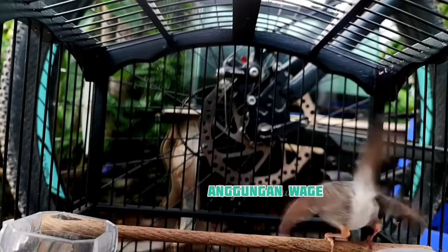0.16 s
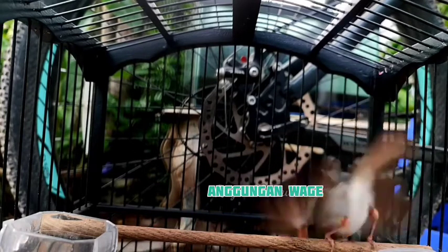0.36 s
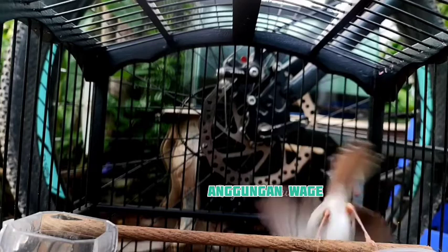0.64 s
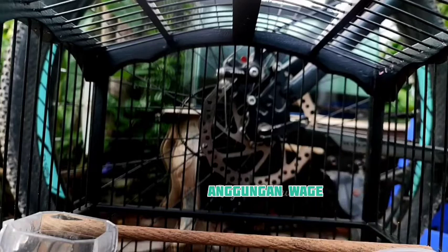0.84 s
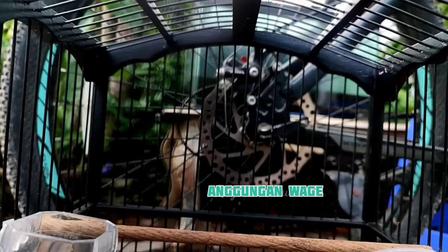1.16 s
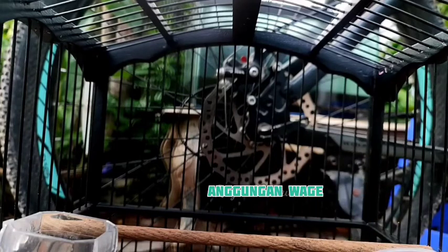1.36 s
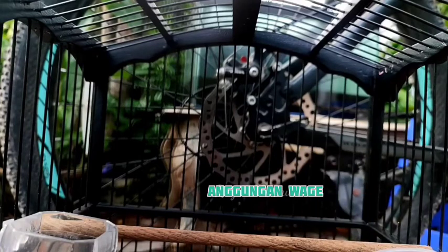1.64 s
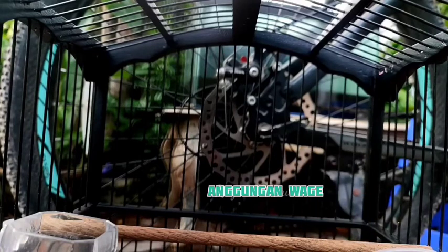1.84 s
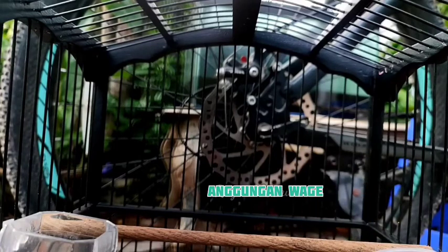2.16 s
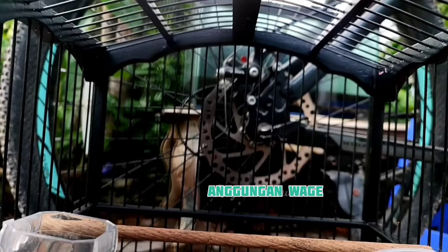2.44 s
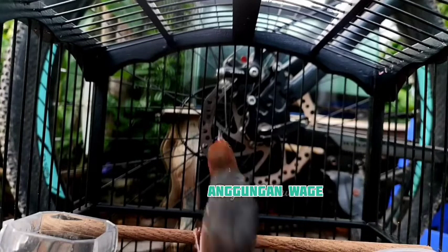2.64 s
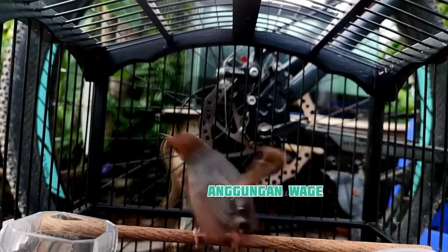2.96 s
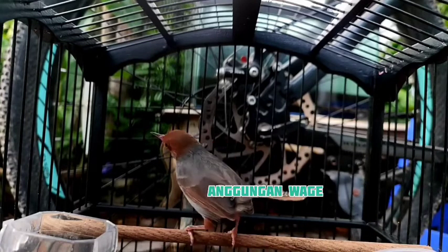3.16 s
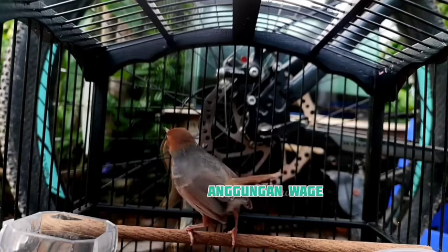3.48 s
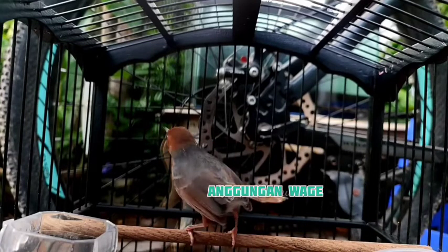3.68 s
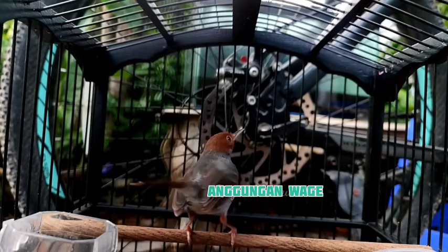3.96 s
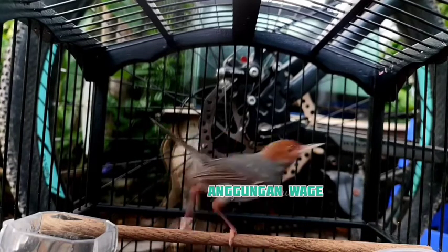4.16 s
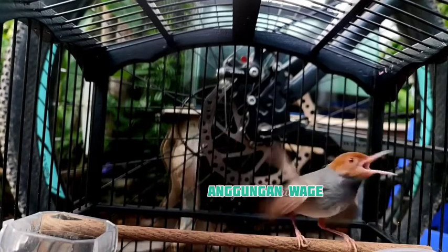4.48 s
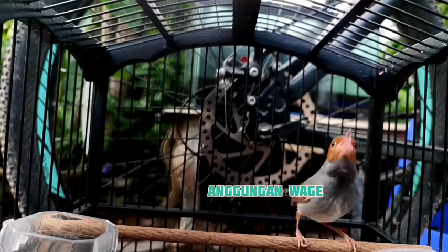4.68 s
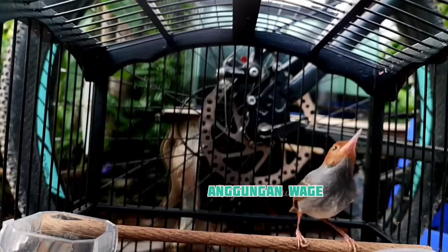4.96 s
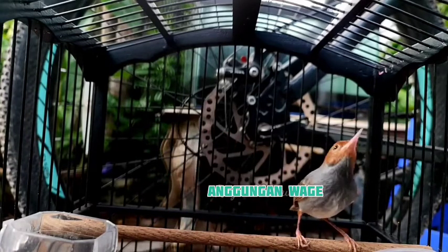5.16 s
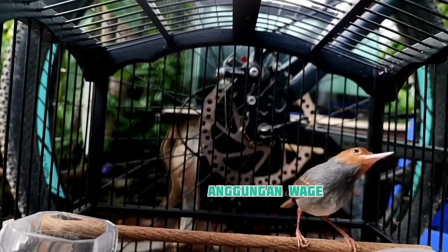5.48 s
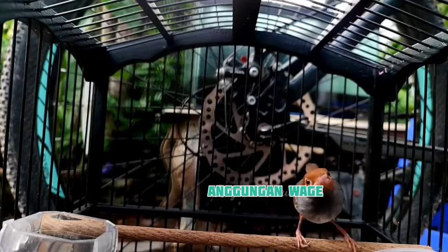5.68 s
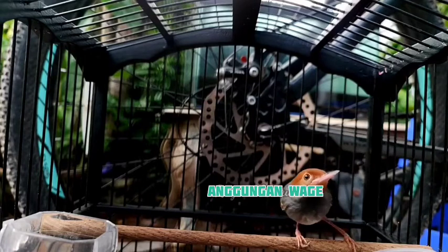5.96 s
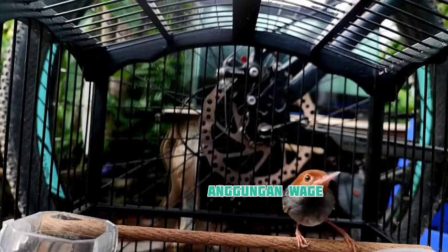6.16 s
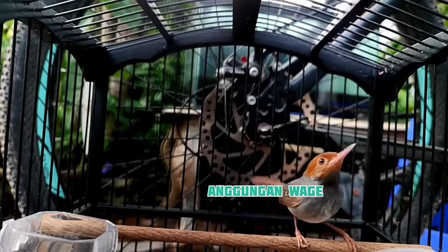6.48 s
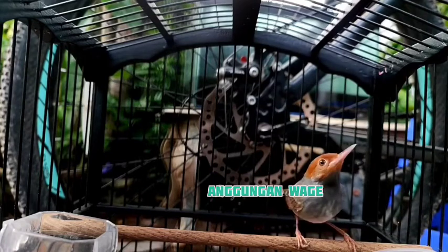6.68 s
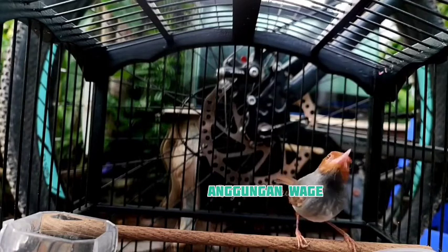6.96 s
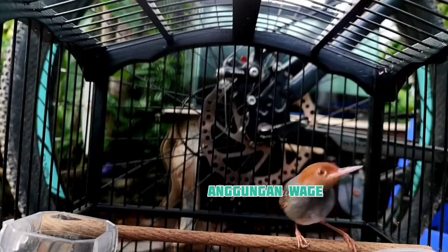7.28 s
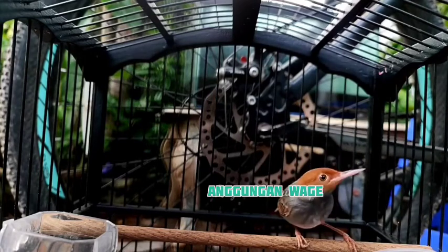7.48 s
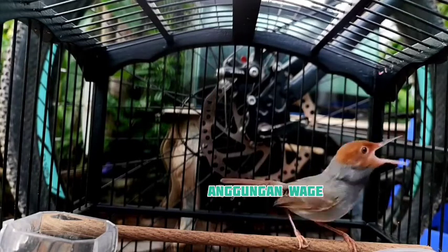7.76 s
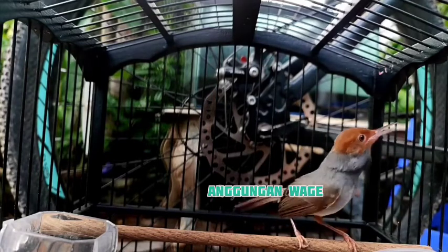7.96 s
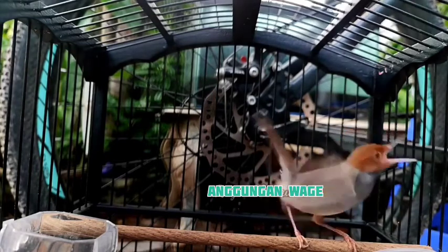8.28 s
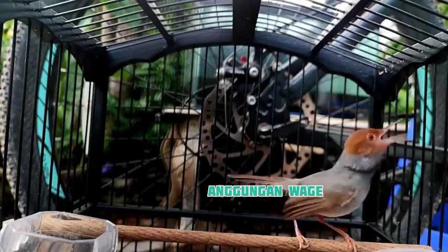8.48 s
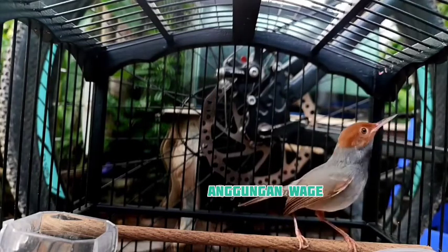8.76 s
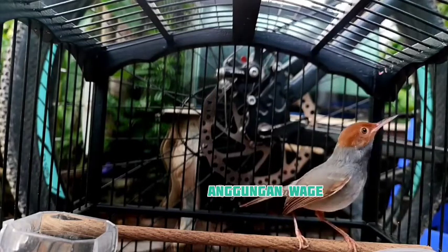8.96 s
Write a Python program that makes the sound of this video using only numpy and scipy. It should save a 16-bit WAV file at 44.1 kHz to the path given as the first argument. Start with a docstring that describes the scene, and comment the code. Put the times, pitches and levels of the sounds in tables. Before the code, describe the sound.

A small caged bird flicks its wings and sings three sharp, quick four-note phrases up close, over faint distant birds and low traffic hum.

```python
"""Far engines, a low traffic hum and hiss run throughout: harmonic series and coloured noise.
From the start other birds chirp, whistle, tick and wheeze, as swept sines, with one reedy toot at 2.3 s.
At 4.6, 7.7 and 8.4 s a caged tailorbird flicks its wings (noise bursts), then sings a four-note phrase of
fast sine glides close by; a chatter starts at 7.2 s and the wheeze returns at 8.3 s.
Loud peaks push the recorder's gain down, and the background swells back slowly."""
import sys
import numpy as np
from scipy import signal
from scipy.fft import rfft, irfft
from scipy.io import wavfile
from scipy.ndimage import uniform_filter1d, minimum_filter1d, map_coordinates

SR = 44100
rng = np.random.default_rng(int(sys.argv[2]) if len(sys.argv) > 2 else 0)


def digitize_waveform(pressure):
    """Quantize a signal to 16-bit integers and store it at the path in sys.argv[1].

    Rows of a 2-D input are taken as channels; values are limited to [-1, 1].
    """
    field = np.atleast_2d(pressure).T
    bounded = np.clip(field, -1, 1)
    quanta = np.round(bounded * 32767).astype(np.int16)
    wavfile.write(sys.argv[1], SR, quanta)


N = 402191
TIME = np.arange(N) / SR   # s

# All levels are relative, ahead of later mixing and gain control.
# Glides of the four notes of the phrase [t/s after onset, f/Hz]
PIP_PITCH = [(0, 2900), (.002, 3500), (.006, 3700), (.01, 3770), (.015, 3680), (.02, 3980), (.024, 3880)]
TSEW_PITCH = [(0, 4950), (.007, 4120), (.017, 3390), (.025, 3220), (.035, 3280), (.044, 3440), (.047, 3350),
              (.05, 2500)]
TUT_PITCH = [(0, 2780), (.007, 2680), (.014, 2620), (.029, 2570)]
WEEO_PITCH = [(0, 2250), (.004, 2270), (.012, 2470), (.016, 2560), (.02, 2760), (.028, 2865), (.035, 2810),
              (.042, 2520), (.052, 2250), (.063, 2020), (.069, 1830), (.076, 1050)]
# Notes; pressure raises pitch and level together [glide, release/s, slope/dB per octave, rasp level/dB]
PIP = (PIP_PITCH, 0.0036, 20, 0)
TSEW = (TSEW_PITCH, 0.0028, 23, 2)
TUT = (TUT_PITCH, 0.021, 15, -7.5)
WEEO = (WEEO_PITCH, 0.012, 13.7, 2)
# The song [t/s, note, time stretch, pitch factor, level/dB, attack/s, gain over the note/dB,
#   left-right level/dB, its change over the note/dB, lag of the right port/ms,
#   delay of the nearest reflection left/ms, right/ms, reflection level/dB]
SONG = [(4.6976, PIP, 0.91, 1, -13, 0.0076, 0.5, 5.5, 2, 0.26, 1.03, 2.06, -13),
        (4.734, TSEW, .98, 1, -7, 0.0078, -1.5, 1.5, -3.5, 0.31, 1.6, 1.14, -11.5),
        (4.8165, TUT, 1.07, 0.99, -8, 0.011, 5, 5.5, -9, .25, 1.07, 1.89, -17),
        (4.8575, WEEO, 1, 0.99, -10, .004, 3, 11.5, -3, 0.19, 0.27, 0.79, -4),
        (7.875, PIP, 0.91, .994, -9.5, 0.0083, 4, 5.5, -1, 0.33, 0.489, 2.6, -7),
        (7.9049, TSEW, 1.12, 1.004, -11.5, .012, -9, -3.5, -3, 0.18, 2.04, 0.075, -4),
        (8.005, TUT, 0.79, 1, -11, 0.0062, -1, 7, -2, 0.039, 1.08, 1.22, -17),
        (8.038, WEEO, 0.96, 0.99, -10.5, 0.0055, 1, 3.5, 1, 0.3, 0.684, 1.11, -2.5),
        (8.4997, PIP, 1.01, .993, -12, 0.013, 3, 12, 9.5, 0.19, 0.3, 1.2, -1.5),
        (8.5326, TSEW, 1.03, 0.99, -8.5, 0.0092, -5.5, -7, -8, 0.5, 1.42, .64, -8),
        (8.6308, TUT, 1, 1, -9.5, 0.0089, 0, 6, 3.5, .14, 0.31, 2.5, -4.5),
        (8.6651, WEEO, 1.016, 1, -7.5, .0045, -3, 3.5, -1, 0.27, 0.42, 0.7, -9.5)]
SONG_DB = 7.5
FLUTTER_DB, FLUTTER_PER_S = 2.07, 450   # the voice trembles within a note
FLICK_S, FLICK_DB = .006, -24   # a brief rasp where a note starts and stops
# Colour of that rasp [f/Hz, level/dB]
FLICK_COLOUR = [(900, -15), (1300, -14), (2100, -8.5), (2600, -3), (3000, -3.5), (4400, -8.5), (5500, -23),
                (12000, -34.5)]
# Overtones that the beak lets out [f/Hz, level/dB]
BEAK = [(4500, -7), (5600, -9.5), (6700, -5), (7600, 1.5), (8500, -22), (9600, -2), (10600, -5),
        (11400, 10.5), (12400, -1.5), (14000, -14)]
# Airy edge of the voice [f/Hz, level/dB]
AIR = [(600, -3.5), (1300, -1), (2000, 1.5), (2500, 3.5), (4300, 5.5), (5500, -7), (7200, -15),
       (9000, -19.5), (11600, -11.5), (14000, -30.5)]
# Left-right balance along the glides [f/Hz, left-right level/dB]
PORT_BALANCE = [(1600, 4.5), (2100, 7), (2450, -9), (2860, -1)]
# Echoes from the cage and nearby things [left delay/ms, right delay/ms, level/dB]
ECHOES = [(2.1, 1.8, -23), (4.4, 5.1, -11.5), (7.2, 6.4, -21), (11.9, 9.2, -17.5)]
# Colour of the porch reverberation [f/Hz, level/dB]
PORCH = [(500, 2.5), (2300, 4), (2850, 1.5), (3300, 3), (3700, 2), (4300, 2.5), (7000, 5), (14000, -2)]

# Feather snaps, one for each wing stroke [t/s, level/dB]
WINGS = [(4.563, -18.5), (4.576, -12), (4.592, -17), (4.606, -12), (4.6205, -11.5), (5.245, -24),
         (7.737, -16.5), (7.752, -17), (7.767, -12.5), (7.782, -14.5), (7.796, -17), (8.394, -8),
         (8.4095, -15)]
# Colour of a snap [f/Hz, level/dB]
SNAP = [(300, -37), (1200, 0), (2500, 8.5), (4000, 3.5), (5200, 1.5), (6300, 10), (7500, 5.5), (9000, -16),
        (14000, -17)]
# Soft knocks [t/s, level/dB, f/Hz]
KNOCKS = [(5.988, -25.5, 775), (8.394, -25, 472)]
# Modes of a knock [multiple of its pitch, level/dB, t60/s]
KNOCK_MODES = [(.55, -21, .012), (1, 5, 0.0094), (1.7, 0.5, .009)]
# Brief rustles [t/s, length/s, level/dB, favoured f/Hz, emphasis/dB]
RUSTLES = [(2.541, 0.32, -47, 4200, 7.5), (2.588, .16, -48.5, 12600, 22), (2.596, .12, -46, 4620, 13),
           (2.646, 0.13, -45.5, 3280, 20), (2.748, 0.18, -40.5, 3700, 14), (3.484, 0.23, -55, 6750, 7),
           (3.893, 0.27, -52.5, 5000, 11), (4.295, 0.089, -56, 5500, -2), (4.552, 0.11, -42, 5170, 7),
           (5.546, 0.18, -43.5, 2600, 2.5), (5.75, 0.098, -37, 7360, 9.5), (5.763, 0.11, -37.5, 1590, 7.5),
           (5.809, .055, -37, 1390, 15), (5.913, .13, -37.5, 3270, 7), (5.928, 0.059, -42.5, 1500, 16),
           (6.025, 0.12, -48.5, 2960, 3.5), (7.103, 0.11, -50.5, 5530, 3), (7.704, 0.11, -43, 5800, 17),
           (8.273, 0.23, -38.5, 3500, 7.5)]
# Colour common to all rustles [f/Hz, level/dB]
FEATHERS = [(300, -14.5), (700, 0), (1500, 0.5), (4000, 1), (7500, -1.5), (9200, -7), (11500, -2.5),
            (14000, -8)]
RUSTLE_WIDTH_OCTAVES = 0.36

# A neighbour's rising wheeze [t/s after onset, f/Hz]
WHEEZE_PITCH = [(0, 3350), (.04, 3650), (.08, 3800), (.11, 4000), (.14, 5700), (.16, 6300), (.18, 6400)]
# Its occurrences [t/s, time stretch, final level/dB, second harmonic level/dB]
WHEEZES = [(0.798, 0.91, -23, -5), (8.307, 0.88, -23.5, -6.5)]
WHEEZE_SWELL_DB_PER_S, WHEEZE_ATTACK_S, WHEEZE_RELEASE_S = 111, 0.0076, 0.02
# Relative pitch shake while it holds, and the shake added at the fastest sweep
WHEEZE_JITTER, WHEEZE_BREAK_JITTER = 0.013, 0.14
WHEEZE_CATCH_S, WHEEZE_CATCH_DB = .02, -41   # the note starts with a broad catch
# Colour of the catch [f/Hz, level/dB]
CATCH = [(1000, -17), (1700, -4), (2500, 4), (3400, -13.5), (4200, -5.5), (6800, -7.5), (9000, -23)]
# A rough hiss builds around the break in the note
WHEEZE_HISS_AT_S, WHEEZE_HISS_S, WHEEZE_HISS_DB = 0.067, 0.12, -8
# Colour of the rough hiss [f/Hz, level/dB]
WHEEZE_HISS = [(2500, -25), (3500, -13), (4300, 4), (5500, -7.5), (7000, -13.5), (9000, -10), (10600, -14),
               (11800, -9.5), (14000, -14)]
# Colour of the wheezer's throat [f/Hz, level/dB]
WHEEZE_THROAT = [(2000, -20.5), (2900, -13), (3400, -0.5), (7500, 1), (9000, -3.5), (10400, -1),
                 (11600, -0.5), (14000, -2)]
RAGGED_DB, RAGGED_HZ, RAGGED_S = 2.3, 600, .011   # depth, width, length of patches in a rough sound

# Raspy arched chirps [t/s, length/s, top f/Hz, share of the note before its top, level/dB]
CHIRPS = [(0.133, 0.045, 5210, 0.66, -41), (0.498, 0.12, 5350, 0.46, -42),
          (0.801, 0.0092, 3360, 0.47, -28.5), (1.209, 0.084, 5350, 0.533, -38.5),
          (1.265, 0.074, 5900, .7, -48), (1.601, 0.047, 4210, 0.65, -46), (1.72, 0.077, 4410, 0.72, -49),
          (2.176, 0.071, 6080, 0.81, -38), (2.417, 0.071, 5600, 0.051, -44.5),
          (2.624, 0.059, 6280, 0.59, -36.5), (2.949, 0.084, 6120, 0.72, -41), (3.552, 0.039, 5770, 1, -37),
          (3.608, .06, 5300, 0.076, -41), (3.963, 0.029, 5440, 0.93, -33.5),
          (4.026, 0.0406, 5130, 0.72, -36.5), (4.315, 0.014, 6800, 0.28, -42.5),
          (5.16, .07, 5670, 0.92, -61), (6.237, 0.051, 5230, 1, -46), (6.487, 0.047, 3670, .5, -50.5),
          (6.573, 0.054, 3460, 0.61, -50), (6.887, 0.089, 4500, 0.48, -50),
          (7.034, 0.032, 5040, 0.57, -45.5), (9.023, 0.16, 5330, 0.3, -43)]
# Usual share before the top (faint chirps), depth of the arch, relative pitch shake
CHIRP_TOP, CHIRP_BEND, CHIRP_JITTER = .65, .18, .032
FAINT_CHIRPS_PER_S, FAINT_CHIRP_DB, FAINT_CHIRP_S = 0.57, -66.5, 0.064
FAINT_LOW_HZ, FAINT_HIGH_HZ = 4200, 5600
# Thin, clean whistles [t/s, length/s, level/dB, decay/dB per s, starting f/Hz, held f/Hz]
SEEPS = [(.29, 0.065, -55, 5, 5970, 6630), (0.37, 0.024, -36, 10, 6750, 7360),
         (0.392, 0.168, -29.5, 29, 7034, 7150), (5.255, 0.081, -44, 10, 6720, 7100)]
SEEP_RISE_S = 0.026
# Runs of ticks [t/s, ticks per s, length/s, level/dB]
TICK_RUNS = [(0.662, 21.6, .12, -47.5), (2.716, 20, .07, -44), (2.91, 17.3, .26, -39.5),
             (6.917, 20.2, .28, -46.5)]
TICK_S, TICK_START_HZ, TICK_END_HZ = 0.0092, 3170, 3370
# A chatter of quick upward strokes in close succession, with a second voice arching above it
CHATTER_AT_S, STROKES_PER_S, STROKE_S, CHATTER_DB = 7.228, 21.7, .042, -33.6
STROKE_START_HZ, STROKE_END_HZ = 3000, 3730
FIRST_STROKE_PITCH, FIRST_STROKE_SOFTER_DB = .87, 9
CHATTER_FADE_DB_PER_S, CHATTER_OVERTONE_DB = 37, -19.5
STROKE_RASP_DB = -6.5   # a rattle under the start of each stroke
# Colour of the rattle [f/Hz, level/dB]
STROKE_RASP = [(1800, -18), (2600, -7.5), (3200, -6), (3750, 6), (4100, -40), (7000, -19), (10000, -38),
               (11500, -18), (14000, -42)]
UPPER_AT_S, UPPER_S, UPPER_HZ, UPPER_BEND, UPPER_TOP, UPPER_DB = 7.29, .2, 4870, .22, .8, -43
TOOT_AT_S, TOOT_S, TOOT_HZ, TOOT_BEND, TOOT_DB = 2.345, 0.137, 446, 0.18, -36.5
# Partials of the far toot [multiple of TOOT_HZ, level/dB]
TOOT_PARTIALS = [(2, 0), (3, -18), (4, -22), (5, -15)]

# A far motorbike's speed [t/s, firings per s]
MOTORBIKE_SPEED = [(0, 84), (1.1, 76), (1.7, 72), (2.3, 84), (3.1, 70), (3.9, 66), (4.6, 80), (5.15, 76),
                   (5.6, 73), (6.3, 69), (6.75, 72.5), (7.4, 70.3), (9.12, 71)]
# Its loudness [t/s, level/dB]
MOTORBIKE_LEVEL = [(0, -68), (1.05, -54), (2.15, -68), (3.1, -55.5), (4.35, -61.5), (5.2, -54.5),
                   (6.6, -55.5), (7.4, -55), (9.12, -58.5)]
# Colour of its exhaust [f/Hz, level/dB]
EXHAUST = [(70, -7), (140, -0.5), (210, -6.5), (280, -13), (350, -11.5), (420, -10.5), (495, -6.5),
           (565, -11), (635, -12), (710, -7), (800, -16.5), (1000, -22.5)]
# Loudness of passing engines [t/s, level/dB]
ROAR_LEVEL = [(0, -54), (.7, -63), (1.15, -56.5), (1.65, -58.5), (2.15, -49.5), (2.8, -58.5), (3.2, -75),
              (3.8, -57), (4.3, -48.5), (4.65, -52.5), (5.2, -67.5), (6.4, -58.5), (7.4, -59.5),
              (9.12, -65.5)]
# Colour of their roar [f/Hz, level/dB]
ROAR = [(120, -25), (230, -5.5), (320, 2.5), (400, -5), (520, -17), (1000, -35.5), (2000, -72.5)]
# Slow swell of the traffic [t/s, level/dB]
TRAFFIC_SWELL = [(0, -1), (2.4, 0.5), (3.3, 0.5), (4.4, 1), (6.4, 0.5), (9.12, 1.5)]
# Colour of the low hum [f/Hz, level/dB]
RUMBLE = [(12, -37), (20, -0.5), (76, -1.5), (128, 1), (149, -1.5), (198, -11.5), (255, -14), (318, -18.5),
          (441, -22.5), (512, -33), (700, -29.5), (910, -53.5), (1540, -120)]
# Colour of the airy hiss [f/Hz, level/dB]
HISS = [(290, -37.5), (500, -1), (728, -4.5), (825, -5), (1030, -7.5), (1680, -8), (2440, -8.5),
        (3860, -13), (12600, -23.5), (13900, -26.5)]
RUMBLE_DB, HISS_DB = -42.5, -53
# Coherence of the two ports [f/Hz, left-right likeness]
LIKENESS = [(30, 0.42), (70, 1), (160, 0.98), (350, 0.94), (700, 0.19), (1400, 0), (12000, 0)]
CUTOFF_HZ = 14100


def tailorbird():
    """Frequency-swept near-sines with raspy edges; as the head turns, reflection combs each note anew."""
    song = np.zeros((2, N))
    rasp, flicks, effort, lag_ms = np.zeros((4, N))
    for (s, note, stretch, tuning, level_db, attack_s, swell_db, pan_db, turn_db,
         late_ms, left_ms, right_ms, bounce_db) in SONG:
        pitch, release_s, db_per_octave, rasp_db = note
        hz = tuning * curves(pitch, stretch)[0]
        along = np.linspace(-.5, .5, len(hz))
        db = SONG_DB + level_db + swell_db * along + db_per_octave * np.log2(hz / hz.mean())
        gate = fade(len(hz), attack_s, release_s)
        flutter_db = FLUTTER_DB * wobble(len(hz), FLUTTER_PER_S)
        tone = gate * whistle(hz, db + flutter_db, [(1, 0)], jitter=.009)
        balance_db = pan_db + turn_db * along + at_hz(PORT_BALANCE, hz)
        left, right = tone * from_db(balance_db * [[.5], [-.5]])
        add(song, s, np.array([bounced(left, left_ms, bounce_db), bounced(right, right_ms, bounce_db)]))
        overtones = [(1.5, -42), (2, -35), (3, -43), (4, -51)]
        add(rasp, s, gate * whistle(hz, db + rasp_db, overtones, jitter=.06, jitter_rate=4100))
        add(effort, s, gate * from_db(db + rasp_db))
        for edge_s in (s, s + len(hz) / SR):
            flick = from_db(SONG_DB + level_db + FLICK_DB) * puff(FLICK_S, FLICK_COLOUR)
            add(flicks, edge_s - FLICK_S / 2, flick)
        lag_ms[int(s * SR):] = late_ms
    air = from_db(-41.5) * effort * rms_one(tint(rng.standard_normal(N), AIR))
    # the edge is beamed away and heard by reflection
    edge = far_off(tint(rasp, BEAK) + air, direct_db=-1.5, room_db=1.5, t60=0.058)
    edge += far_off(flicks, direct_db=-9.5, room_db=-2, t60=0.1)
    return edge + in_cage(song, lag_ms, echo_db=-3.5, room_db=-23.0, t60=0.35)


def wings_and_feet():
    """Impulsive excitation: feathers snap at the end of each wing stroke, and feet knock on the perch."""
    snaps = bursts(WINGS, SNAP, decay_s=.0014, swish_db=-20, swish_s=.005)
    return in_cage(snaps + knocks(), lag_ms=.2, echo_db=-6, room_db=-16, t60=.35)


def bursts(rows, colour, decay_s, swish_db, swish_s):
    """Amplitude-modulated noise: each contact is a sharp crack inside a softer swish."""
    envelope = np.zeros(N)
    t = np.arange(-SR // 50, SR // 10) / SR
    crack = (t >= 0) * np.exp(-abs(t) / decay_s)
    shape = crack + from_db(swish_db) * np.exp(-abs(t) / swish_s)
    for s, db in rows:
        add(envelope, s + t[0], from_db(db) * shape)
    noise = rms_one(tint(rng.standard_normal(N), colour))
    return .5 * envelope * noise * np.ones((2, 1))


def knocks():
    """Modal decay: the cage answers a shifting foot with a few damped sines."""
    out, t = np.zeros(N), TIME[:SR // 20]
    for s, db, hz in KNOCKS:
        for k, level_db, t60 in KNOCK_MODES:
            add(out, s, from_db(db + level_db - 60 * t / t60) * np.sin(2 * np.pi * k * hz * t))
    return out


def rustles():
    """Friction noise: soft, ragged swells of feather hiss, each with one favoured band."""
    out, hz = np.zeros((2, N)), np.geomspace(300, 14000, num=40)
    for s, length, db, centre_hz, emphasis_db in RUSTLES:
        size = int(length * SR)
        octaves_off = np.log2(hz / centre_hz)
        band_db = emphasis_db * np.exp(-.5 * (octaves_off / RUSTLE_WIDTH_OCTAVES) ** 2)
        colour = list(zip(hz, at_hz(FEATHERS, hz) + band_db))
        noise = rms_one(tint(rng.standard_normal((2, size)), colour))
        grain_db = 1.8 * wobble(size, rate=500)
        add(out, s, noise * np.hanning(size) ** 0.6 * from_db(db + grain_db))
    return ragged(out + from_db(-3.5) * reverb(out, t60=0.27))


def wheezer():
    """Frequency jitter grows with sweep rate: a swelling, rising note turns harsh where it climbs fastest."""
    out, catches = np.zeros((2, N))
    for s, stretch, level_db, overtones_db in WHEEZES:
        hz, = curves(WHEEZE_PITCH, stretch)
        sweep = uniform_filter1d(np.gradient(hz), size=1900)
        jitter = WHEEZE_JITTER + WHEEZE_BREAK_JITTER * (sweep / sweep.max()) ** 2
        db = level_db - WHEEZE_SWELL_DB_PER_S * TIME[:len(hz)][::-1]
        partials = [(1, 0), (2, overtones_db), (3, overtones_db - 2)]
        gate = fade(len(hz), WHEEZE_ATTACK_S, WHEEZE_RELEASE_S)
        add(out, s, gate * whistle(hz, db, partials, jitter, jitter_rate=3300))
        add(catches, s - WHEEZE_CATCH_S / 4, from_db(WHEEZE_CATCH_DB) * puff(WHEEZE_CATCH_S, CATCH))
        hiss = from_db(level_db + WHEEZE_HISS_DB) * puff(WHEEZE_HISS_S, WHEEZE_HISS)
        add(out, s + WHEEZE_HISS_AT_S, hiss)
    return ragged(far_off(tint(out, WHEEZE_THROAT) + catches, direct_db=1.0, room_db=4.5, t60=0.35))


def small_birds():
    """Superposition: the other birds of the neighbourhood share one distant, reverberant path."""
    return far_off(chirps() + seeps() + ticks() + chatter(count=6), direct_db=-1.0, room_db=-4, t60=0.32)


def chirps():
    """Frequency modulation: raspy arched chirps, with fainter ones at random times and pitches."""
    out = np.zeros(N)
    draws = rng.random((max(int(FAINT_CHIRPS_PER_S * N / SR), 1), 2))
    faint = [(when * N / SR, FAINT_CHIRP_S, FAINT_LOW_HZ + high * (FAINT_HIGH_HZ - FAINT_LOW_HZ),
              CHIRP_TOP, FAINT_CHIRP_DB) for when, high in draws]
    for s, length, hz, top, db in CHIRPS + faint:
        add(out, s, arch(length, hz, db, CHIRP_BEND, top, [(1, -1), (2, -41)], CHIRP_JITTER))
    return out


def seeps():
    """Exponential relaxation: a thin whistle slides up to its pitch, holds it and dies away."""
    out = np.zeros(N)
    for s, length, db, dying_db_per_s, start_hz, held_hz in SEEPS:
        t = TIME[:int(length * SR)]
        hz = held_hz + (start_hz - held_hz) * np.exp(-t / SEEP_RISE_S)
        tone = whistle(hz, db - dying_db_per_s * t, [(1, 0)], jitter=0.0042)
        add(out, s, fade(len(t), attack_s=0.0048, release_s=0.018) * tone)
    return out


def ticks():
    """Periodic repetition: even runs of tiny, slightly rising notes."""
    out = np.zeros(N)
    for s, rate, length, db in TICK_RUNS:
        for onset in np.arange(s, s + length, 1 / rate):
            add(out, onset, chirp(TICK_S, TICK_START_HZ, TICK_END_HZ, db, rough=.7))
    return out


def chatter(count):
    """Upward sweeps in close succession, each softer after the second, under an arching second voice."""
    out, u = np.zeros(N), np.linspace(0, 1, int(STROKE_S * SR))
    for k in range(count):
        onset = CHATTER_AT_S + k / STROKES_PER_S
        hz = STROKE_END_HZ + (STROKE_START_HZ - STROKE_END_HZ) * (1 - u) ** 6
        db = CHATTER_DB - CHATTER_FADE_DB_PER_S * k / STROKES_PER_S
        if k == 0:
            hz = hz * FIRST_STROKE_PITCH
            db -= FIRST_STROKE_SOFTER_DB
        buzz_db = 4 * wobble(len(u), rate=900)
        stroke = whistle(hz, db + buzz_db, [(1, 0), (3, CHATTER_OVERTONE_DB)], jitter=0.03)
        add(out, onset, fade(len(u), attack_s=0.0058, release_s=0.031) * stroke)
        rattle = from_db(db + STROKE_RASP_DB + buzz_db) * puff(STROKE_S, STROKE_RASP)
        add(out, onset - STROKE_S / 4, rattle)
    upper = arch(UPPER_S, UPPER_HZ, UPPER_DB, UPPER_BEND, UPPER_TOP, [(1, 0)], jitter=.018)
    add(out, UPPER_AT_S, upper)
    return out


def toot():
    """Additive synthesis: upper harmonics without their fundamental make one short, far, reedy tone."""
    out = np.zeros(N)
    tone = arch(TOOT_S, TOOT_HZ, TOOT_DB, TOOT_BEND, 0.507, TOOT_PARTIALS, jitter=0.043, jitter_rate=180)
    add(out, TOOT_AT_S, tone)
    return far_off(out, direct_db=-5.5, room_db=0, t60=.33)


def motorbike():
    """Harmonic series of the firing rate: exhaust tones follow the engine's speed and fade in and out."""
    hz = np.interp(TIME, *np.transpose(MOTORBIKE_SPEED))
    phase = 2 * np.pi * np.cumsum(hz * (1 + .016 * wobble(N, rate=45))) / SR
    drone = np.zeros(N)
    for k in range(1, 13):
        harmonic_db = at_hz(EXHAUST, k * np.median(hz)) + 3.5 * wobble(N, rate=4.6)
        drone += np.sin(k * phase) * from_db(harmonic_db)
    level = from_db(np.interp(TIME, *np.transpose(MOTORBIKE_LEVEL)))
    return far_off(rms_one(drone) * level, direct_db=-2, room_db=-1, t60=0.1)


def passing_engines():
    """Filtered noise: a dull roar without a clear pitch swells and sinks as vehicles go by."""
    level = from_db(np.interp(TIME, *np.transpose(ROAR_LEVEL)))
    roar = rms_one(tint(rng.standard_normal(N), ROAR)) * level
    return far_off(roar, direct_db=-2, room_db=-3.5, t60=.2, lag_ms=.1)


def traffic():
    """Partial coherence: the low rumble is alike at both ports, the hiss is not; both swell together."""
    swell_db = np.interp(TIME, *np.transpose(TRAFFIC_SWELL))
    alike = np.clip(at_hz(LIKENESS, np.fft.rfftfreq(N, 1 / SR)), -1, 1)
    out = np.zeros((2, N))
    for colour, db, waver_db in [(RUMBLE, RUMBLE_DB, 1.2), (HISS, HISS_DB, .5)]:
        mid, side = rfft(rng.standard_normal((2, N)))
        noise = irfft(np.sqrt(1 + alike) * mid + np.sqrt(1 - alike) * side * [[1], [-1]], N)
        out += rms_one(tint(noise, colour)) * from_db(db + swell_db + waver_db * wobble(N, rate=34.0))
    return out


def whistle(hz, db, partials, jitter, jitter_rate=1500):
    """Phase is the integral of frequency: a sine and its overtones, shaken by an unsteady membrane."""
    phase = 2 * np.pi * np.cumsum(hz * (1 + jitter * wobble(len(hz), jitter_rate))) / SR
    audible = [from_db(level) * np.sin(k * phase) * (k * hz < SR / 2) for k, level in partials]
    return from_db(db) * sum(audible)


def arch(length, top_hz, db, bend, top, partials, jitter, jitter_rate=1500):
    """Parabolic frequency sweep: a swelling note climbs to its top pitch and sags again."""
    u = np.linspace(0, 1, int(max(length, .004) * SR))
    hz = top_hz * (1 - bend * (u - top) ** 2)
    return np.sqrt(abs(np.sin(np.pi * u))) * whistle(hz, db, partials, jitter, jitter_rate)


def chirp(length, start_hz, end_hz, db, rough):
    """Decelerating frequency sweep: a swelling note whose glide flattens toward its end."""
    u = np.linspace(0, 1, int(max(length, .004) * SR))
    hz = end_hz + (start_hz - end_hz) * (1 - u) ** 2
    tone = whistle(hz, np.full(len(u), db), [(1, 0), (2, -30)], jitter=.055 * rough, jitter_rate=1500)
    return np.sqrt(abs(np.sin(np.pi * u))) * tone


def puff(length, colour):
    """Windowed noise: a short swell of a given colour."""
    size = int(max(length, .002) * SR)
    return np.hanning(size) * rms_one(tint(rng.standard_normal(size), colour))


def ragged(x):
    """Time-frequency modulation: each band swells and dips on its own, in uneven patches."""
    hz, t, cells = signal.stft(x, SR, nperseg=256)
    chance = rng.standard_normal((int(hz[-1] / RAGGED_HZ) + 2, int(t[-1] / RAGGED_S) + 2))
    grid = np.meshgrid(hz / RAGGED_HZ, t / RAGGED_S, indexing="ij")
    patches = map_coordinates(chance, grid, order=1)
    gain = rms_one(from_db(RAGGED_DB * rms_one(patches)))
    return signal.istft(cells * gain, SR, nperseg=256)[1][..., :N]


def bounced(tone, delay_ms, db):
    """Comb interference: a note together with its reflection from the nearest surface."""
    at = np.arange(len(tone) + SR // 200)
    return sum(gain * np.interp(at - ms * SR / 1000, np.arange(len(tone)), tone, left=0, right=0)
               for ms, gain in [(0, 1), (delay_ms, from_db(db))])


def in_cage(x, lag_ms, echo_db, room_db, t60):
    """Precedence of direct sound: it reaches the left port first; close echoes and the porch follow."""
    mid = x.mean(axis=0)
    echoes = sum(from_db(db) * np.array([delayed(mid, left), delayed(mid, right)])
                 for left, right, db in ECHOES)
    scatter = from_db(-14) * reverb(mid, t60=.12)
    direct = np.array([x[0], delayed(x[1], lag_ms)])
    return direct + from_db(echo_db) * echoes + scatter + from_db(room_db) * reverb(mid, t60)


def far_off(x, direct_db, room_db, t60, lag_ms=0.322):
    """Interaural delay and diffuse field: a distant sound reaches the left port first, with reverberation."""
    direct = np.array([x, delayed(x, lag_ms)])
    return from_db(direct_db) * direct + from_db(room_db) * reverb(x, t60)


def reverb(x, t60):
    """Diffuse decay: dense reflections die away, different at each port; unit mean energy."""
    t = TIME[:SR]
    decay = from_db(-60 * t / t60) * (1 - np.exp(-t / 0.0019))
    tail = tint(rng.standard_normal((2, SR)), PORCH) * decay
    return signal.fftconvolve(np.atleast_2d(x), rms_one(tail) / np.sqrt(SR), axes=1)[:, :N]


def delayed(x, ms):
    """Propagation delay by interpolation between samples."""
    return np.interp(TIME - ms / 1000, TIME, x, left=0)


def fade(size, attack_s, release_s):
    """Amplitude envelope: a rounded attack, a hold and a rounded release."""
    t = np.arange(size) / SR
    return np.sin(np.pi / 2 * np.clip(np.minimum(t / attack_s, t[::-1] / release_s), 0, 1)) ** 2


def wobble(size, rate):
    """Band-limited chance: random values joined by straight lines, with a spread near 1."""
    at = np.arange(size) * rate / SR
    knots = int(at[-1]) + 2
    return np.interp(at, np.arange(knots), rng.standard_normal(knots))


def curves(rows, stretch=1):
    """Linear interpolation of the columns of a (t/s, value, ..) table from its first row to its last."""
    s, *columns = np.transpose(rows)
    s = np.maximum.accumulate(s - s[0]) * stretch
    return [np.interp(np.arange(0, s[-1], 1 / SR), s, c) for c in columns]


def tint(x, spectrum):
    """Linear filtering: multiply the spectrum by a (f/Hz, level/dB) table."""
    size = x.shape[-1]
    return irfft(rfft(x) * from_db(at_hz(spectrum, np.fft.rfftfreq(size, 1 / SR))), size)


def at_hz(points, hz):
    """Interpolation on a logarithmic frequency axis."""
    points = np.array(points)
    return np.interp(np.log(np.maximum(hz, 1)), np.log(points[:, 0]), points[:, 1])


def from_db(db):
    """Decibels to amplitude ratio."""
    return 10 ** (np.asarray(db) / 20)


def rms_one(x):
    """Normalisation to unit root-mean-square amplitude."""
    return x / np.sqrt(np.mean(x ** 2) + 1e-20)


def add(track, s, sound):
    """Linear superposition of a sound into a track at a time."""
    start = int(np.clip(round(s * SR), 0, N - 1))
    track[..., start:start + sound.shape[-1]] += sound[..., :N - start]


def gain_control(x, ceiling_db, release_s):
    """Dynamic compression: peaks pull the gain down just ahead; it returns quickly at first, then creeps."""
    over = np.maximum(20 * np.log10(abs(x).max(axis=0) + 1e-9) - ceiling_db, 1e-9)
    # each excess in dB decays exponentially until a greater one takes over
    held = np.exp(np.maximum.accumulate(np.log(over) + TIME / release_s) - TIME / release_s)
    return x * from_db(uniform_filter1d(minimum_filter1d(-held, size=801), size=801))


def scene():
    """Superposition of all sources, from the near bird to the background."""
    near = tailorbird() + wings_and_feet() + rustles()
    far = wheezer() + small_birds() + toot()
    return near + far + motorbike() + passing_engines() + traffic()


def record(dry):
    """Slow gain control, then a low-pass filter that cuts the top."""
    levelled = gain_control(dry, ceiling_db=-1.0, release_s=1.75)
    return signal.sosfilt(signal.ellip(10, .2, 70, CUTOFF_HZ, fs=SR, output="sos"), levelled)


dry = scene()
out = record(dry)
digitize_waveform(out)
```